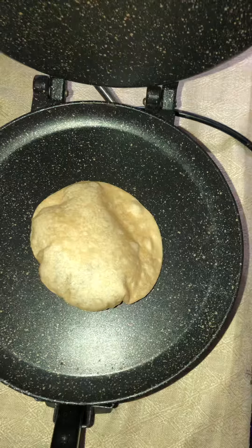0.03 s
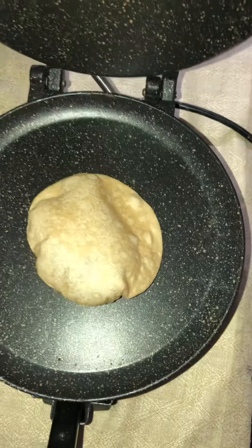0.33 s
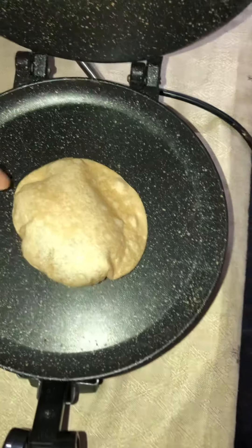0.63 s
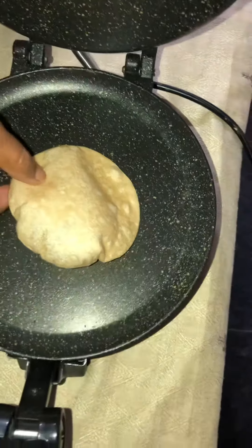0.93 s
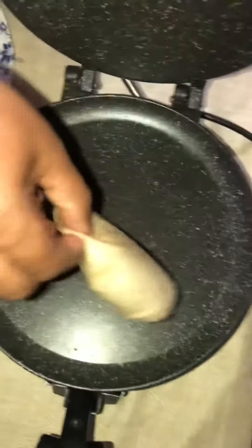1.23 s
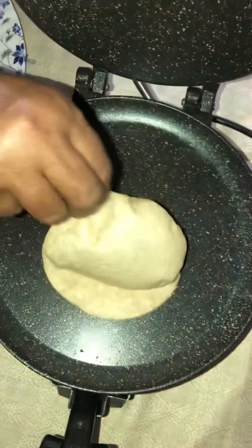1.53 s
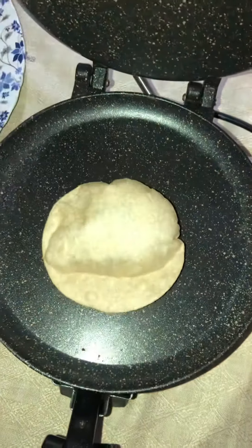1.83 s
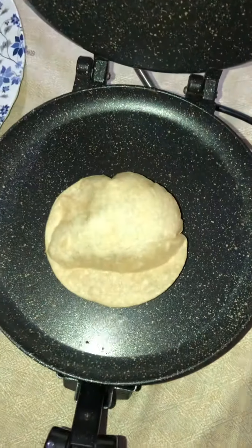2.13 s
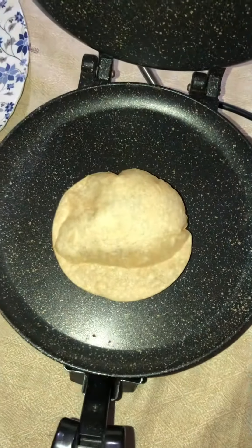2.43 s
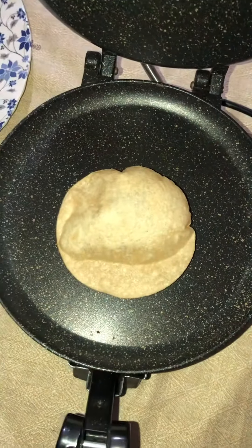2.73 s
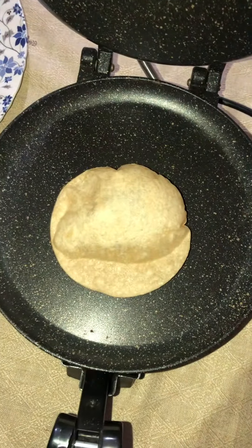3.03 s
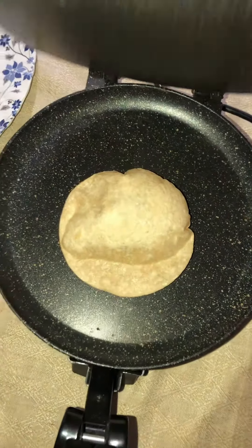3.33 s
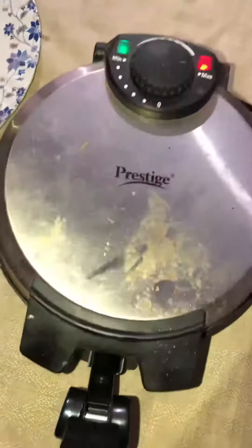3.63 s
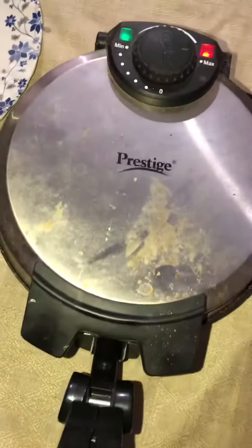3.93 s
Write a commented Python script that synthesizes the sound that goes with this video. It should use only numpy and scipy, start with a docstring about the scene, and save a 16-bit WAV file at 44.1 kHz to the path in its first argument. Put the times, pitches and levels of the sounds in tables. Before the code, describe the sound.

A flatbread maker's metal lid closes with a loud clack. Before it come a ringing metal tap, faint finger rustles, hot plate ticks and a squeaking hinge; afterwards the lid rings and settles. Close microphone in a small kitchen.

```python
"""An electric flatbread maker on a close microphone in a small kitchen, in mono. Something metal is
tapped and rings; fingers rustle and knock as they turn the bread, and the hot plate ticks. Then the
lid is gripped: its hinge sticks and slips, squeaking and grinding, the rims meet with a clack, and the
lid rings, thuds onto the bread and settles. Behind it are the kitchen's reverberation and low air."""
import sys
import numpy as np
from scipy import signal
from scipy.fft import rfft, irfft
from scipy.io import wavfile
from scipy.ndimage import map_coordinates

SR = 44100
rng = np.random.default_rng(int(sys.argv[2]) if len(sys.argv) > 2 else 0)


def store_pcm(level_fs):
    """Save levels as 16-bit WAV."""
    pcm = np.round(np.clip(level_fs, -1, 1) * 32767).astype(np.int16)
    wavfile.write(sys.argv[1], SR, np.atleast_2d(pcm).T)


N = 176400

# noise of the rims clacking and of the lid's shell rattling: band_hz, level_db, t60_s
CLACK_BANDS = [(81, -64, .08), (227, -29, 0.14), (496, -31, 0.044), (1020, -30.5, 0.063),
               (1890, -20.5, 0.025), (3140, -35, 0.056), (4740, -26, 0.01), (7300, -37.5, 0.087),
               (15200, -29, 0.059)]
SHELL_BANDS = [(30, -38, 0.35), (45, -50.5, 0.53), (111, -48, 0.41), (231, -44.5, 2.4), (510, -51, 2.1),
               (900, -50, 1.68), (1990, -52, 0.26), (4900, -54.5, 1.04), (10300, -59, 0.7),
               (15900, -50.5, 0.41)]
# modes of the lid's body, its thud on the bread and its handle: pitch_hz, level_db, t60_s
LID_MODES = [(57.9, -5.5, 0.81), (95.7, 4, 0.22), (197, -2.5, 2.3), (209, -7.5, 1.5), (232, -5, 0.97),
             (315, -0.5, 0.83), (415, -3, 1.9), (565.8, -3, 1.74), (624, 1, 0.22), (721, -0.5, .5),
             (1105, -15, 0.84), (1643, -9, 0.46), (1733, -3, 0.34), (2490, -14, 0.35)]
THUD_MODES = [(230, -7, 0.072), (293, -1.5, 0.065), (380, -1.5, 0.038), (558, 0, 0.049), (607.4, -4, 0.18),
              (765, -9.5, 0.083)]
HANDLE_MODES = [(604, 3.5, 0.097), (1314, 4, 0.032), (1407, 7, 0.013), (2080, 3.5, 0.03),
                (2360, 4.5, 0.016), (3670, -12, .015)]
# impacts as the lid lands and settles: start_s, level_db, brightness_hz
RIM_CONTACTS = [(3.472, -22, 5000), (3.48, -13.5, 9070), (3.488, -5, 2750), (3.4942, 2, 14000),
                (3.501, -6.5, 13930), (3.507, -15.5, 15200), (3.527, -33, 4000), (3.538, -17.5, 3040),
                (3.565, -10, 1390)]
LID_BLOWS = [(3.498, -35, 5000), (3.564, -45.5, 770)]
THUDS = [(3.4975, -13, 260), (3.556, -25.5, 700), (3.5635, -18, 1100), (3.669, -30, 350),
         (3.725, -24.5, 347), (3.799, -25.5, 270), (3.85, -31, 278)]
HANDLE_SNAPS = [(3.7195, -33, 3400), (3.846, -44.5, 1680), (3.927, -51, 2500)]
# hinge squeaks: start_s, length_s, from_hz, to_hz, level_db, roughness_share
SQUEAKS = [(3.097, 0.04, 3650, 3550, -44.5, 0.026), (3.132, 0.049, 3495, 3400, -44, 0.021),
           (3.155, 0.032, 3500, 2746, -44.5, 0.032), (3.181, 0.024, 3900, 5380, -45, .03),
           (3.194, 0.027, 5200, 5610, -45.5, 0.022), (3.206, 0.05, 5600, 4830, -49, .03),
           (3.262, 0.026, 1030, 1104, -40.5, 0.023), (3.301, 0.018, 3870, 3160, -44, 0.032),
           (3.303, 0.056, 2800, 1284, -47, 0.029), (3.346, 0.015, 1180, 864, -44.5, 0.059),
           (3.286, 0.076, 9860, 9950, -53.5, 0.025), (3.336, 0.036, 9800, 9700, -24, 0.0047),
           (3.366, .03, 3480, 3370, -47, 0.044), (3.395, 0.026, 4170, 3600, -42.5, 0.05),
           (3.445, 0.016, 6480, 6330, -34, 0.023), (3.454, 0.0128, 6570, 4800, -38.5, 0.027)]
# course of the hinge friction: time_s, level_db
GRIND_LEVELS = [(3.038, -55), (3.1, -57), (3.25, -55.5), (3.331, -53), (3.402, -45), (3.44, -54.5),
                (3.481, -42), (3.509, -33)]
# noise of the metal tap and of its bright early reflections: band_hz, level_db, t60_s
TAP_BANDS = [(45, -52, 0.18), (116, -47, 0.44), (305, -43, 0.26), (574, -45.5, .05), (1240, -24, 0.071),
             (2210, -30.5, 0.063), (4260, -24, 0.018), (8040, -32, 0.0041), (10400, -28.5, 0.0093),
             (15820, -44, .014)]
TAP_ECHO_BANDS = [(1000, -49.5, 0.17), (4030, -44, 0.33), (8000, -58.5, 0.26), (12000, -49, 0.32),
                  (16000, -51, .17)]
# modes of the tapped metal, the damped striker, the housing and the plate: pitch_hz, level_db, t60_s
TAP_MODES = [(951, -0.5, .8), (921, -1, 0.74), (1206, -5.5, 0.99), (1230, 1.5, .5), (1587, -5.5, .55),
             (1663, -5, .5), (2078, -5, .7), (2210, -10, .52), (2444, -4, 0.64), (2492, -6, 0.73),
             (2670, -9.5, 0.79), (2820, -6, .75), (2900, -8, .6), (3290, -7, .55), (3870, -11, .6),
             (4296, -12.5, .45), (4860, -9, 0.43), (5360, -11, .55), (6100, -13, .35)]
STRIKER_MODES = [(888, -25.5, 0.091), (1227, -19.5, 0.067), (1610, -24, 0.021), (2170, -28, 0.037),
                 (2600, -29, 0.049), (2710, -19, 0.021), (3247, -17, 0.032), (4300, -22.5, 0.026),
                 (4826, -20, 0.022), (5380, -49, 0.017), (6100, -27.5, 0.024), (7360, -19.5, 0.013),
                 (8230, -19.5, 0.012), (9800, -25, 0.0096)]
HOUSING_MODES = [(148, -19.5, 0.058), (195.4, -8, 0.13), (318, -2.5, 0.072), (429.6, -1, 0.044),
                 (533, -1.5, 0.028), (612, -5, 0.056), (884, 1, 0.032), (1055, -3, 0.042),
                 (1310, 0.5, 0.013), (2150, -7.5, 0.021), (3150, -10, 0.0085)]
PLATE_MODES = [(4070, -8, .05), (4370, -6.5, 0.042)]
# knocks on the housing: start_s, level_db, low_hz, high_hz
KNOCKS = [(.077, -20.5, 60, 170), (0.7532, -37, 450, 1050), (0.761, -32.5, 112, 234),
          (0.774, -41, 119, 700), (.83, -47.5, 400, 1810), (1.143, -47.5, 150, 1200),
          (1.177, -41.5, 170, 1290), (1.6757, -46, 2230, 4000), (1.8735, -36.5, 90, 433),
          (1.9056, -35.5, 725, 3560), (2.92, -49.5, 920, 2600), (3.0598, -27.5, 300, 2230),
          (3.067, -26, 202, 424), (3.146, -48, 200, 1500), (3.353, -36, 450, 1010), (3.383, -40, 200, 2000),
          (3.399, -30, 201, 714), (3.412, -28, 255, 875), (3.422, -27.5, 151, 657),
          (3.456, -22.5, 100, 238), (3.98, -35.5, 153, 495)]
# click of the hot plate: band_hz, level_db, t60_s
TICK_BANDS = [(500, -9, 0.019), (1970, -5.5, 0.035), (3200, -5, 0.041), (4260, -2.5, 0.039),
              (5200, -4.5, 0.018), (9000, -4, 0.039), (11000, 0.5, 0.032), (12400, 1, 0.029),
              (15100, 1, 0.035)]
# ticks of the hot plate: start_s, level_db, brightness_hz
TICKS = [(.7744, -52.5, 5200), (1.1725, -46.5, 15030), (1.434, -61.5, 8900), (1.466, -47.5, 13800),
         (1.5305, -53.5, 8900), (1.543, -57, 10600), (1.614, -61, 7000), (1.676, -53.5, 3770),
         (1.8926, -48, 14900), (1.9895, -55, 14000), (2.197, -48.5, 16000), (2.3695, -54, 13800),
         (2.479, -49.5, 14240), (3.06, -42.5, 11000), (3.926, -61.5, 7150)]
# handling rustles: centre_s, width_s, level_db, brightness_hz
RUSTLES = [(.08, 0.0057, -51, 4530), (0.389, 0.063, -57.5, 8660), (.92, 0.019, -59, 9000),
           (1.03, 0.078, -58.5, 3900), (1.14, 0.014, -59, 4000), (1.54, 0.06, -65, 4000),
           (1.828, 0.057, -54, 8750), (1.92, 0.12, -51, 1360), (2.1, 0.11, -63.5, 9450),
           (2.471, 0.056, -51, 12000), (2.82, 0.079, -60.5, 11600), (2.928, 0.0093, -54, 2000),
           (2.96, 0.017, -57, 2520), (2.97, 0.035, -62, 13800), (3.123, 0.018, -50, 15000),
           (3.937, .008, -58, 2000), (3.965, 0.056, -48.5, 2170)]
# kitchen reverberation: band_hz, level_db, t60_s
KITCHEN_BANDS = [(100, -72, 0.57), (320, -61, 0.54), (1000, -63, 0.81), (3000, -56, 0.75), (4920, -54, 0.6),
                 (9030, -54.5, 0.34), (16000, -54.5, 0.17)]
# colour of the hinge's scrape, the rubbing and the room's air: frequency_hz, relative_db
SCRAPE_COLOUR = [(200, -17), (1500, 4.5), (3500, -6.5), (7000, -11.5), (15000, -14)]
RUB_COLOUR = [(100, 1.5), (400, 1.5), (1000, 1), (2200, 0), (4000, -3.5), (8000, -6.5), (15000, -5)]
AIR_COLOUR = [(15, -48), (25, -35), (43, -4), (86, -12), (113, 0.5), (281, -1), (359, -4.5), (445, -13),
              (970, -17.5), (1050, -19), (1750, -23.5), (2060, -24), (2700, -25), (4040, -32),
              (15500, -39.5)]

SHELL_START_S, SHELL_FLUTTER_DB = 3.506, 3
SQUEAK_RASP_DB, SQUEAK_BREAK_DB, SQUEAK_WAVER = 123, 54.5, 0.54  # spreads per unit of roughness
SQUEAK_CATCH_S = 0.0042  # time scale on which the hinge catches
OCTAVE_DB, OCTAVE_DB_PER_DB, OCTAVE_FULL_AT_DB = -4, 0.76, -32  # harder squeaks gain more octave
SLIPS_PER_S, SCRAPE_DB = 300, 0.5
TAP_START_S, TAP_RING_DB = .0863, -39.5
# how much of each source reaches the walls
LID_ROOM_DB, SQUEAK_ROOM_DB, TAP_ROOM_DB, RING_ROOM_DB, SMALL_ROOM_DB = -4.5, -2.5, -.5, -4, -2
ECHO_DELAY_S, AIR_DB = .007, -53.5
LOW_CUT_HZ, HIGH_CUT_HZ = 39, 15900


def lid():
    """The rims meet in a quick cluster; the loose lid rings unevenly, thuds on the bread and settles."""
    body = ring(LID_MODES, size=32768)
    thud = ring(THUD_MODES, size=8192)
    handle = ring(HANDLE_MODES, size=2048)
    ringing = play(LID_BLOWS, lambda: body)
    add(ringing, SHELL_START_S, burst(SHELL_BANDS, size=32768))
    ringing = waver(ringing, share=0.0252, seconds=0.0306)
    ringing *= amp(SHELL_FLUTTER_DB * wobble(seconds=0.034))
    clack = play(RIM_CONTACTS, lambda: burst(CLACK_BANDS, size=4096, hold_s=0.002))
    return clack + ringing + play(THUDS, lambda: thud) + play(HANDLE_SNAPS, lambda: handle)


def hinge_squeaks():
    """Stick-slip squeaks with a weak octave; rough ones rasp, waver and break as the hinge catches."""
    out = np.zeros(N)
    jitter = wobble(seconds=0.0007) + SQUEAK_WAVER * wobble(SQUEAK_CATCH_S)
    rasp_db = SQUEAK_RASP_DB * wobble(seconds=0.001) + SQUEAK_BREAK_DB * wobble(SQUEAK_CATCH_S)
    for start_s, length_s, from_hz, to_hz, db, rough in SQUEAKS:
        i, n = int(start_s * SR), int(length_s * SR)
        pitch_hz = np.geomspace(from_hz, to_hz, n) * (1 + rough * jitter[i:i + n])
        phase = 2 * np.pi * np.cumsum(pitch_hz) / SR
        swell = np.hanning(n) * unit(amp(rough * rasp_db[i:i + n]))
        octave = amp(OCTAVE_DB + OCTAVE_DB_PER_DB * min(db - OCTAVE_FULL_AT_DB, 0))
        tone = np.sin(phase) + octave * np.sin(2 * phase)
        add(out, start_s, np.sqrt(2) * amp(db) * swell * tone)
    return out


def hinge_grind(housing):
    """Uneven slips shake the housing and scrape, harder as the lid gathers speed."""
    time_s, db = np.array(GRIND_LEVELS).T
    effort = amp(np.interp(np.arange(N) / SR, time_s, db, left=-np.inf, right=-np.inf))
    slips = (rng.random(N) < SLIPS_PER_S / SR) * rng.standard_normal(N)
    shake = unit(signal.fftconvolve(slips, housing)[:N])
    scrape = unit(noise(SCRAPE_COLOUR) * amp(wobble(seconds=0.0068)))  # patchy by about 1 dB
    return effort * (shake + amp(SCRAPE_DB) * scrape)


def metal_tap():
    """A damped striker clicks on metal and sets closely spaced modes ringing; returns click and ring."""
    click, ringing = np.zeros(N), np.zeros(N)
    crack = burst(TAP_BANDS, size=32768, hold_s=0.0017)
    add(click, TAP_START_S, crack + ring(STRIKER_MODES, size=32768))
    add(ringing, TAP_START_S, amp(TAP_RING_DB) * ring(TAP_MODES, size=44100))
    return click, ringing


def knocks(housing):
    """Fingers and lid knock the housing; each contact wakes its own range of modes."""
    out = np.zeros(N)
    for start_s, db, low_hz, high_hz in KNOCKS:
        add(out, start_s, amp(db) * lowpass(highpass(housing, low_hz), high_hz, order=4))
    return out


def plate_ticks():
    """The hot plate ticks: a dry click with a small ping."""
    ping = ring(PLATE_MODES, size=2048)
    return play(TICKS, lambda: burst(TICK_BANDS, size=2048) + ping)


def rustles():
    """Soft swells of rubbing as the bread and the hand move."""
    t, rub = np.arange(N) / SR, noise(RUB_COLOUR)
    return sum(amp(db) * np.exp(-.5 * ((t - centre_s) / width_s) ** 2) * lowpass(rub, hz)
               for centre_s, width_s, db, hz in RUSTLES)


def kitchen(to_walls):
    """The walls return reverberation and the tap's bright early reflections, over low steady air."""
    out = np.zeros(N)
    add(out, ECHO_DELAY_S, signal.fftconvolve(to_walls, burst(KITCHEN_BANDS, size=32768))[:N])
    add(out, TAP_START_S + ECHO_DELAY_S, burst(TAP_ECHO_BANDS, size=16384))
    return out + amp(AIR_DB) * noise(AIR_COLOUR)


def ring(modes, size):
    """Decaying modes of alternating sign, set off by one blow."""
    t = np.arange(size) / SR
    return sum((-1) ** k * amp(db) * np.sin(2 * np.pi * hz * t) * np.exp(-np.log(1000) * t / t60)
               for k, (hz, db, t60) in enumerate(modes))


def burst(bands, size, hold_s=0):
    """Noise in third-octave bands that hold for hold_s, then each die at their own rate."""
    decay_s = np.maximum(np.arange(size) / SR - hold_s, 0)
    hz = np.fft.rfftfreq(size, 1 / SR)
    edges_hz = 28 * 2 ** (np.arange(29) / 3)
    white, out = rfft(rng.standard_normal(size)), 0
    for lo, hi in zip(edges_hz, edges_hz[1:]):
        db, t60 = along(np.sqrt(lo * hi), bands)
        band = irfft(white * ((hz >= lo) & (hz < hi)), size) * np.sqrt(SR / 2 / (hi - lo))
        out = out + band * amp(db) * np.exp(-np.log(1000) * decay_s / t60)
    return out


def noise(colour):
    """Steady noise of a given colour, rms 1."""
    db, = along(np.fft.rfftfreq(N, 1 / SR), colour)
    return unit(irfft(rfft(rng.standard_normal(N)) * amp(db), N))


def play(events, sound):
    """Sound each impact at its own time, level and brightness."""
    out = np.zeros(N)
    for start_s, db, brightness_hz in events:
        add(out, start_s, amp(db) * lowpass(sound(), brightness_hz))
    return out


def wobble(seconds):
    """Random unsteadiness on a given time scale, rms 1."""
    return unit(lowpass(rng.standard_normal(N), .5 / seconds))


def waver(x, share, seconds):
    """Let the pitch wander by a small share."""
    shift = share * seconds * SR / np.pi * wobble(seconds)
    return map_coordinates(x, [np.arange(N) + shift], order=3)


def along(hz, table):
    """Read the columns of a table on a log-frequency axis."""
    columns = np.array(table, float).T
    return [np.interp(np.log(hz + 1), np.log(columns[0]), column) for column in columns[1:]]


def lowpass(x, hz, order=2):
    """Dull the sound above hz."""
    return signal.sosfilt(signal.butter(order, min(hz, .45 * SR), fs=SR, output="sos"), x)


def highpass(x, hz):
    """Thin the sound below hz."""
    return signal.sosfilt(signal.butter(2, hz, "high", fs=SR, output="sos"), x)


def amp(db):
    """Decibels to gain."""
    return 10 ** (np.asarray(db) / 20)


def unit(x):
    """Scale to rms 1."""
    return x / np.sqrt(np.mean(x ** 2))


def add(out, start_s, x):
    """Mix x in at start_s."""
    i = int(start_s * SR)
    out[i:i + len(x)] += x[:N - i]


def scene():
    """The flatbread maker close to the microphone, with the kitchen behind it."""
    housing = ring(HOUSING_MODES, size=8192)
    tap, tap_ring = metal_tap()
    closing, squeaks = lid(), hinge_squeaks()
    small_sounds = hinge_grind(housing) + rustles() + knocks(housing) + plate_ticks()
    direct = closing + squeaks + tap + tap_ring + small_sounds
    to_walls = (amp(LID_ROOM_DB) * closing + amp(SQUEAK_ROOM_DB) * squeaks + amp(TAP_ROOM_DB) * tap
                + amp(RING_ROOM_DB) * tap_ring + amp(SMALL_ROOM_DB) * small_sounds)
    return (direct + kitchen(to_walls))[None]


def record(dry):
    """The recorder cuts the deep bass and the top."""
    thinned = highpass(highpass(dry, LOW_CUT_HZ), LOW_CUT_HZ)
    return signal.sosfilt(signal.ellip(10, .2, 70, HIGH_CUT_HZ, fs=SR, output="sos"), thinned)


dry = scene()
out = record(dry)
store_pcm(out)
```